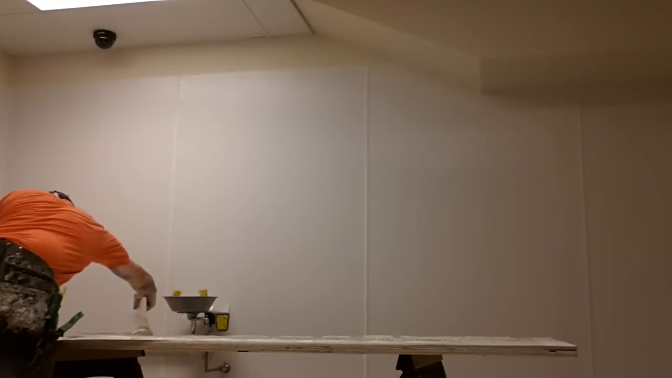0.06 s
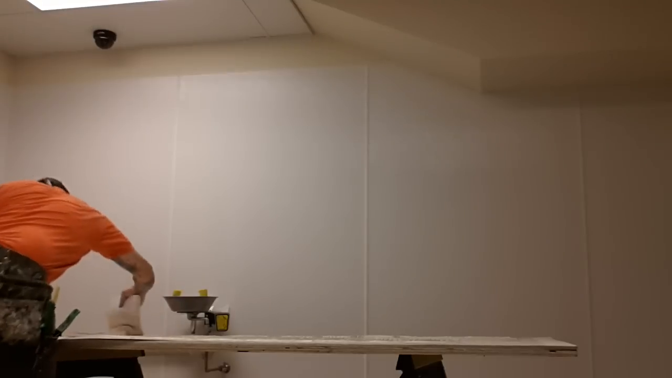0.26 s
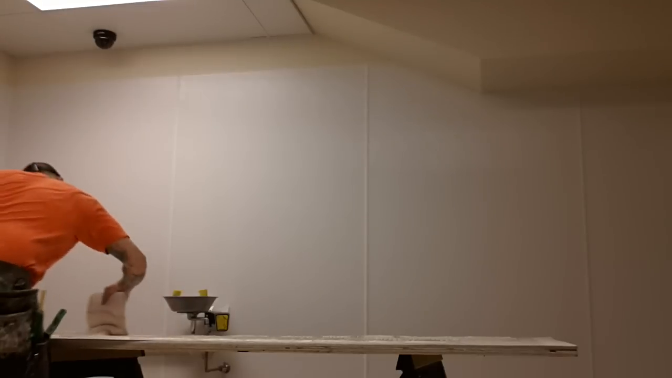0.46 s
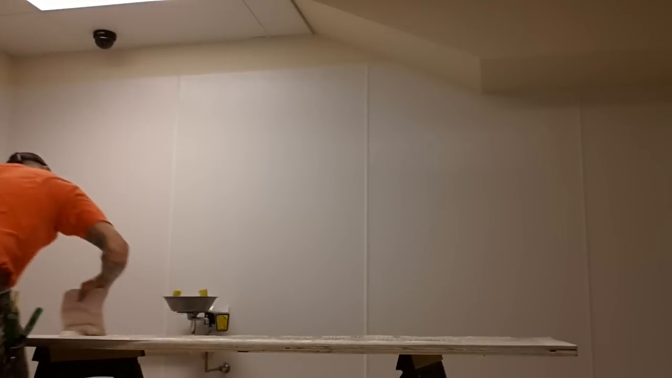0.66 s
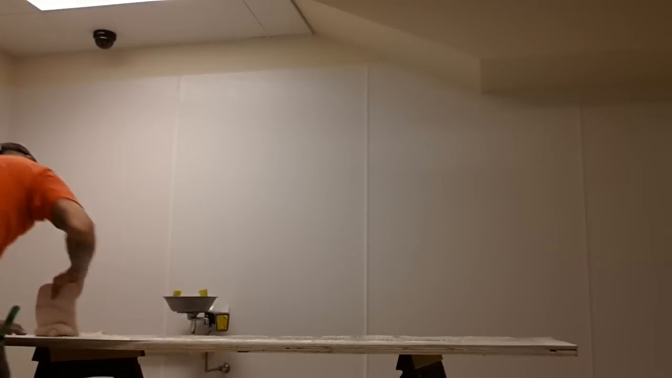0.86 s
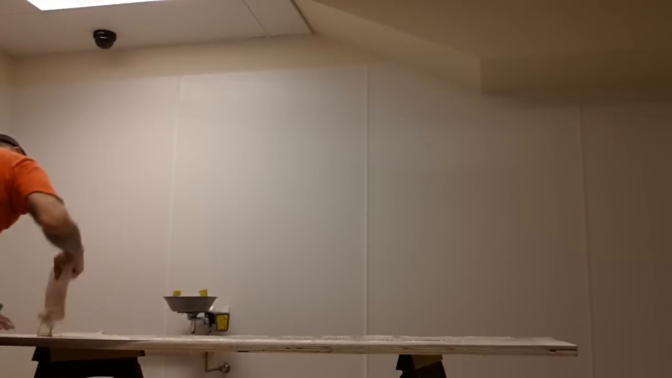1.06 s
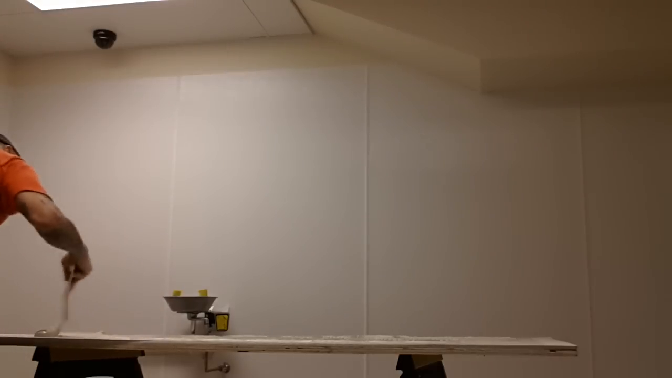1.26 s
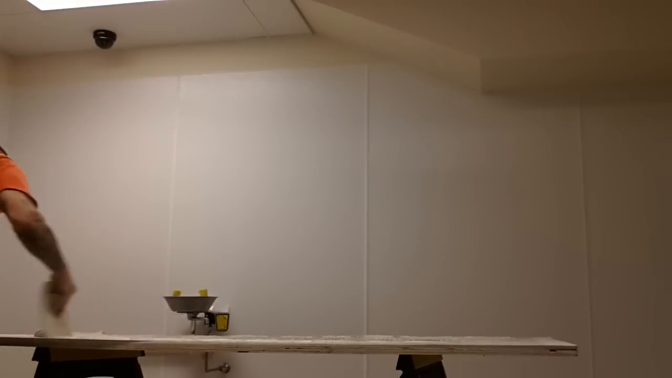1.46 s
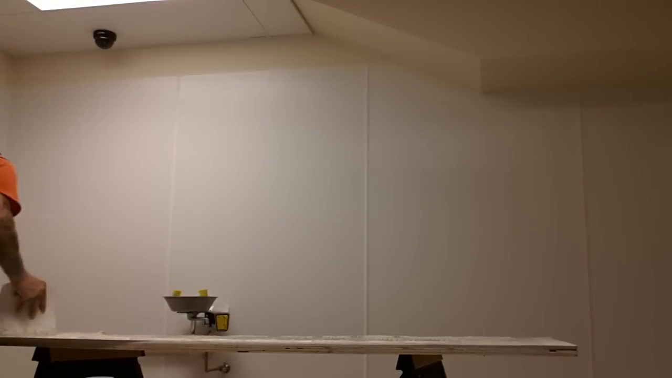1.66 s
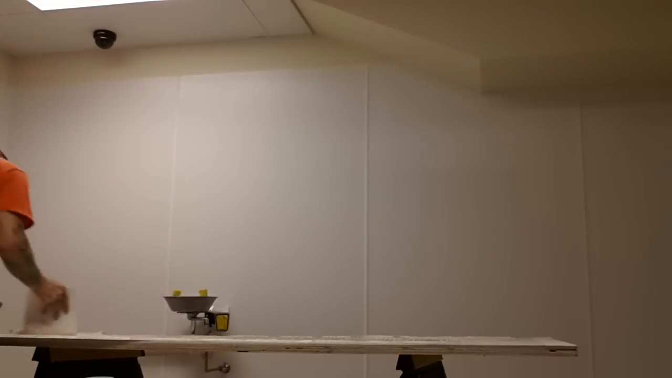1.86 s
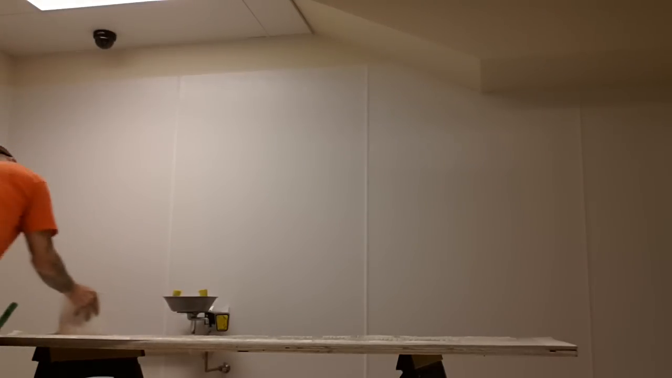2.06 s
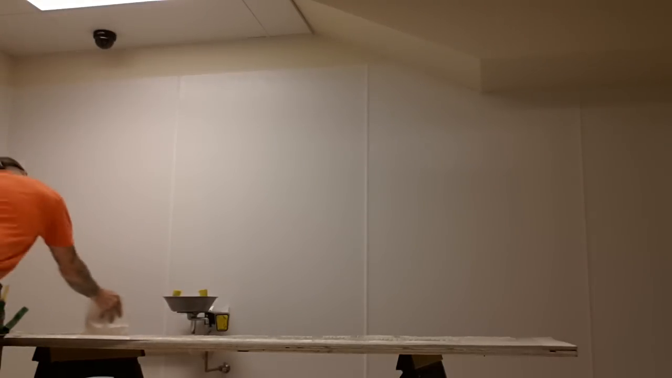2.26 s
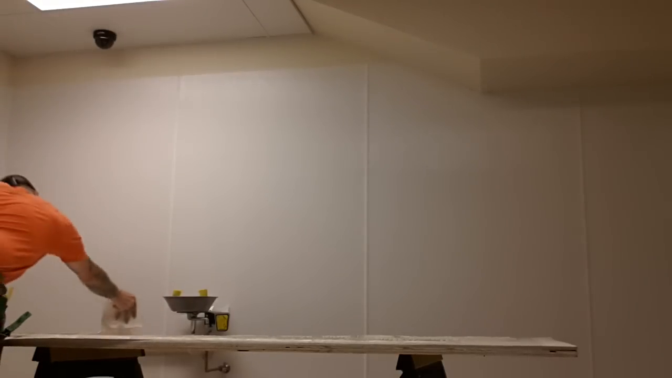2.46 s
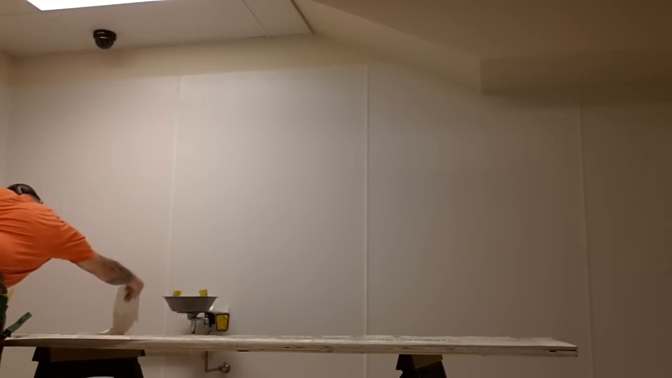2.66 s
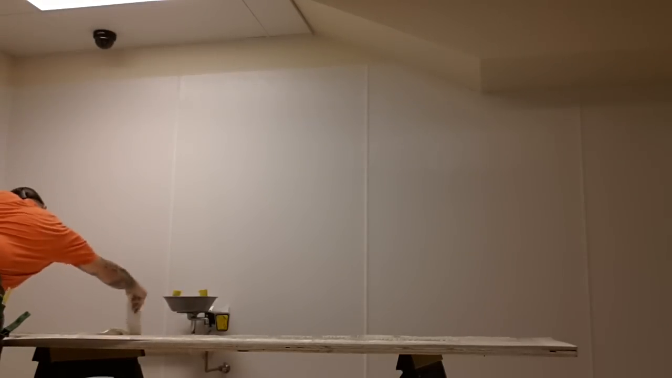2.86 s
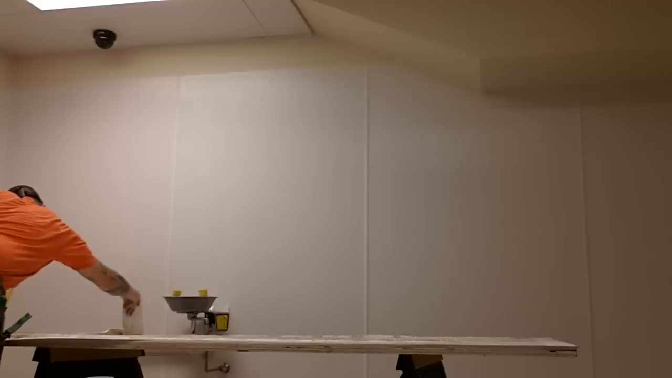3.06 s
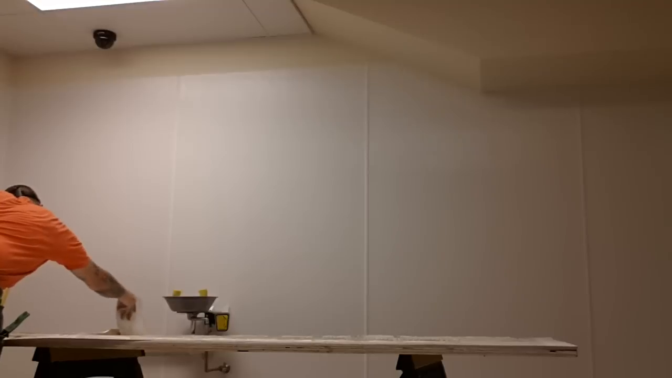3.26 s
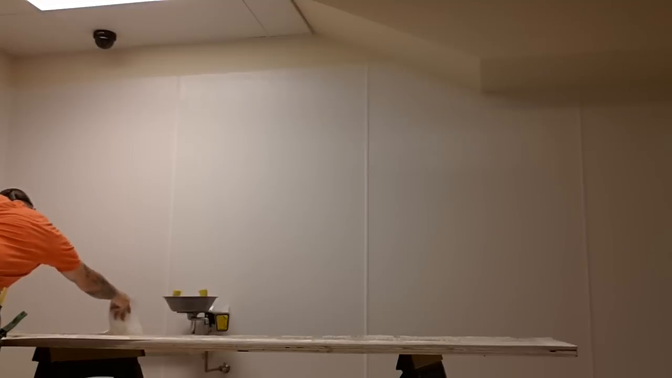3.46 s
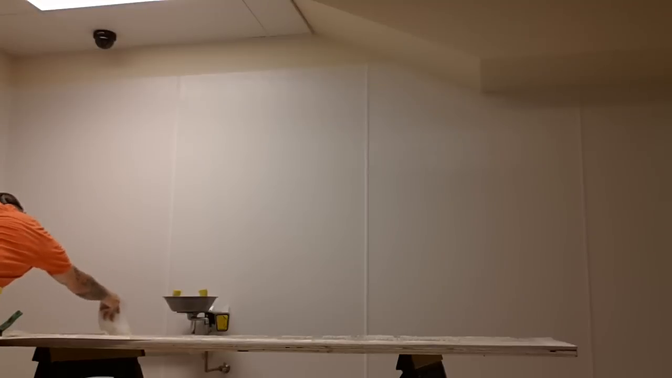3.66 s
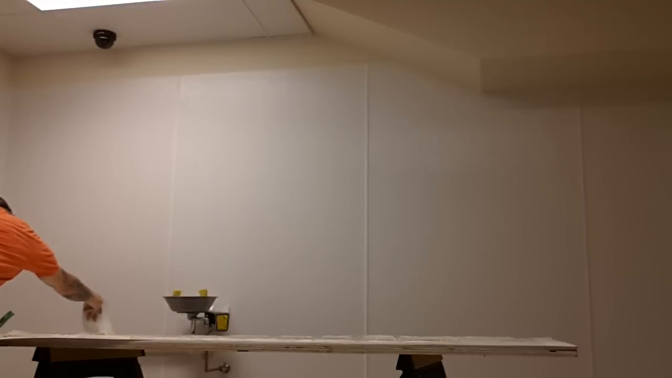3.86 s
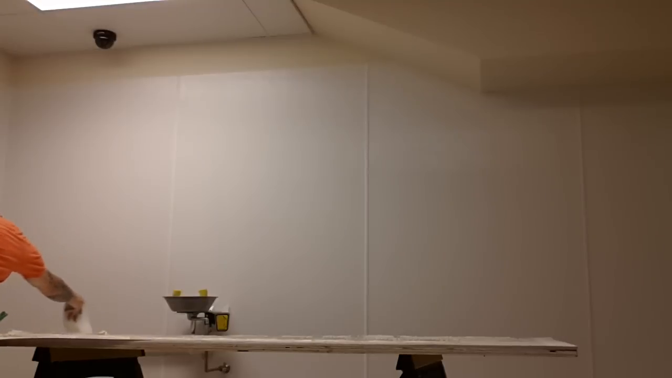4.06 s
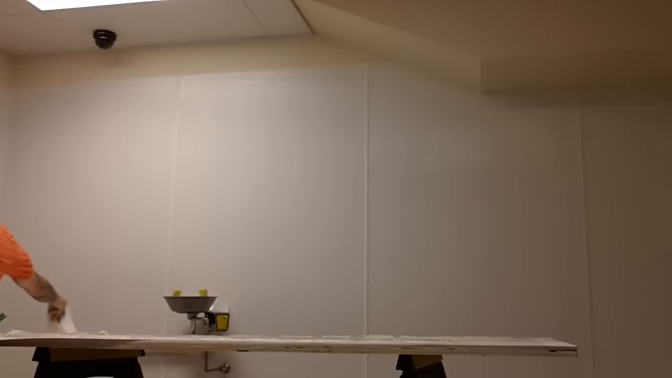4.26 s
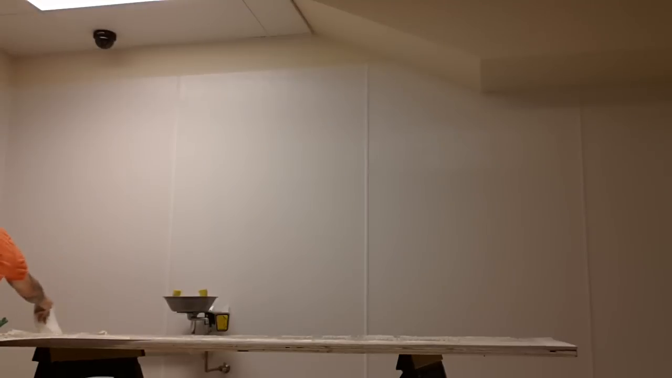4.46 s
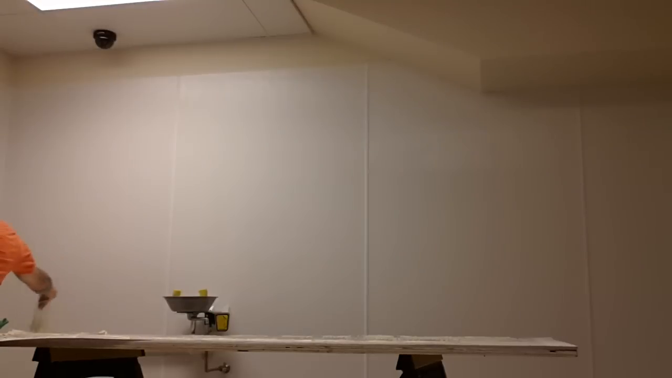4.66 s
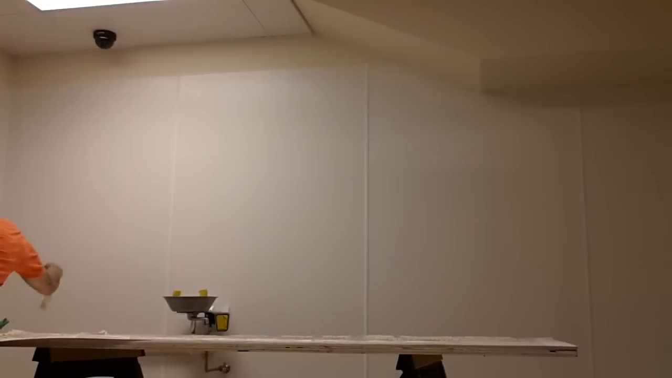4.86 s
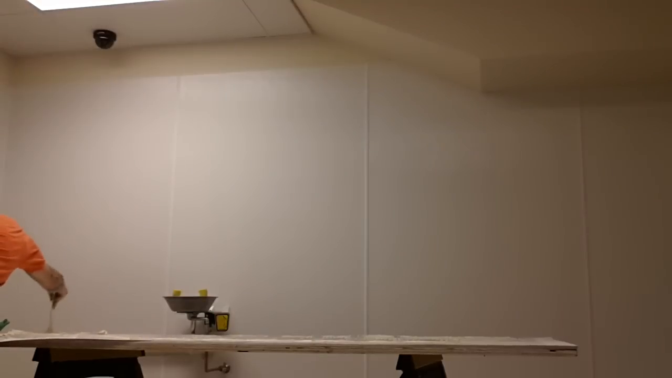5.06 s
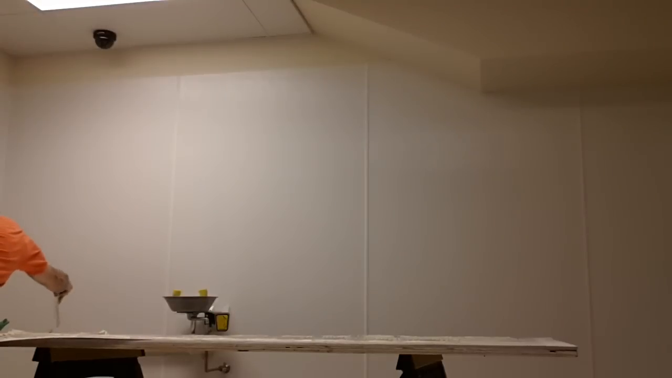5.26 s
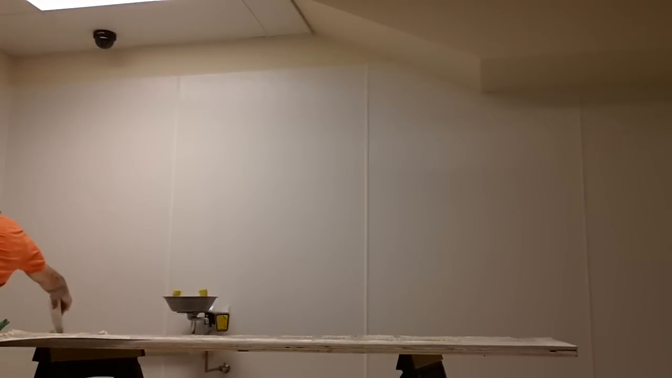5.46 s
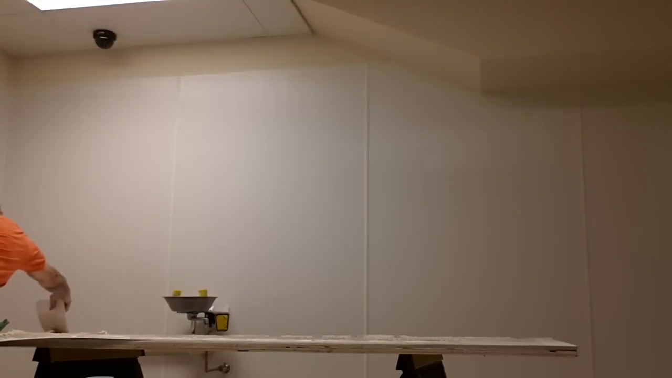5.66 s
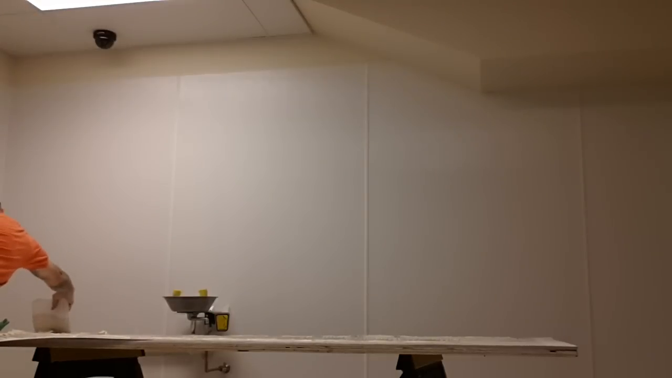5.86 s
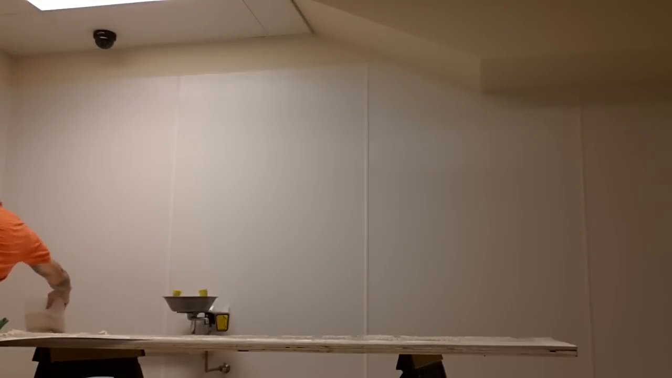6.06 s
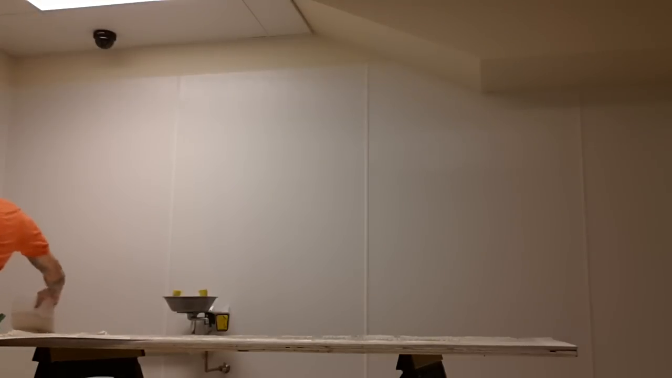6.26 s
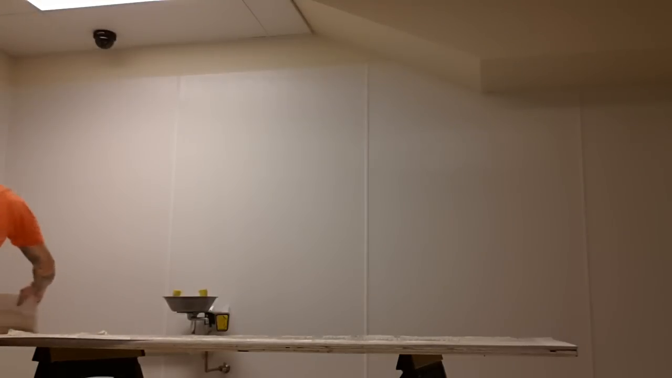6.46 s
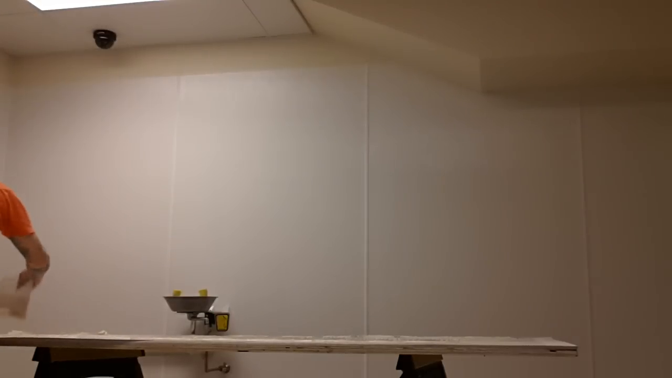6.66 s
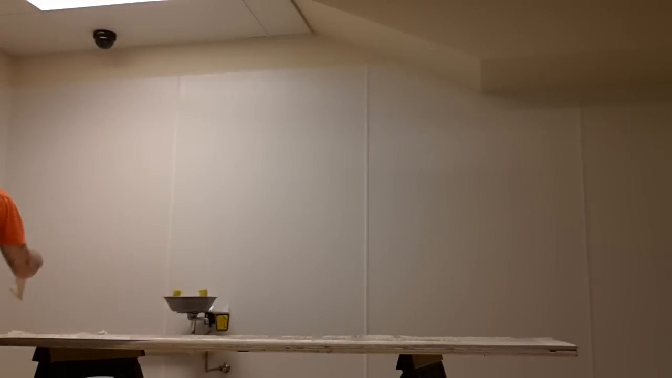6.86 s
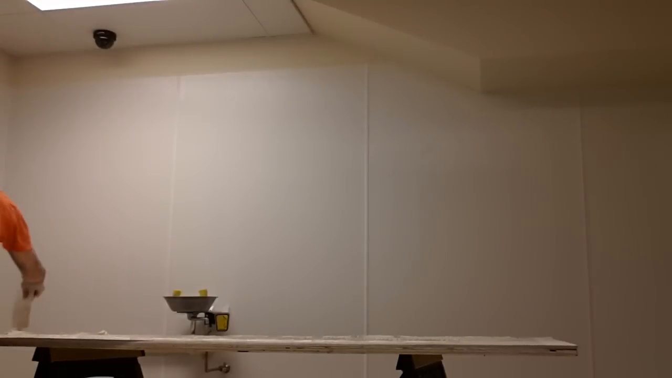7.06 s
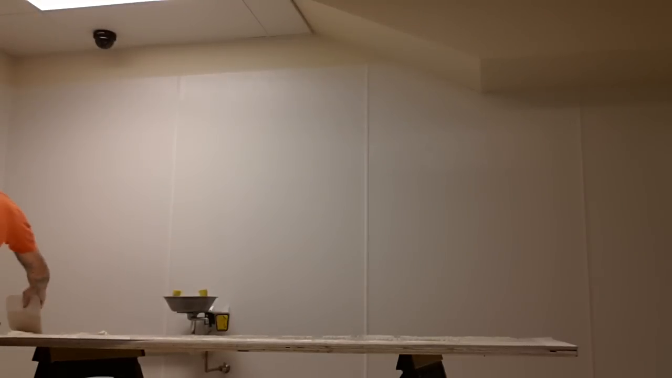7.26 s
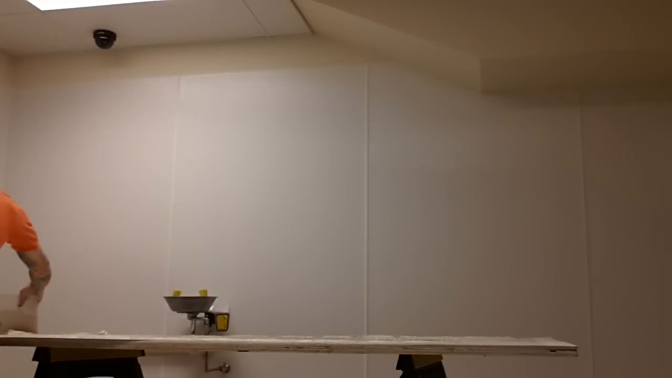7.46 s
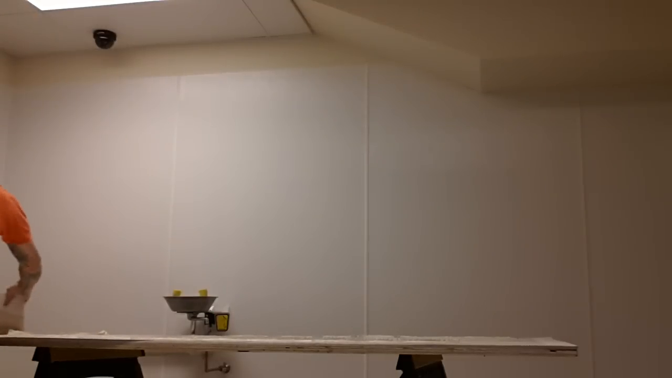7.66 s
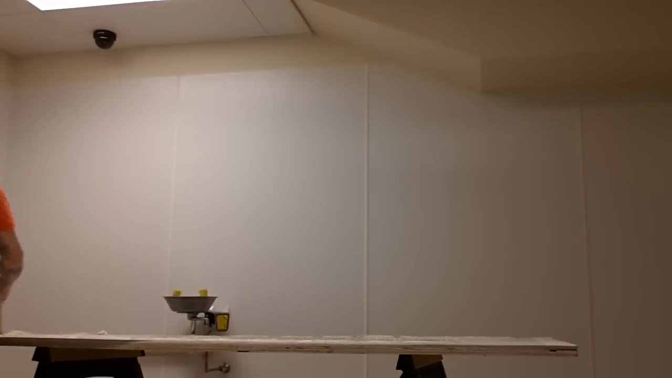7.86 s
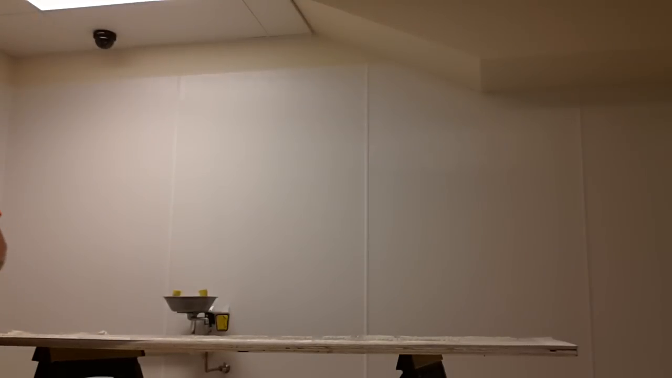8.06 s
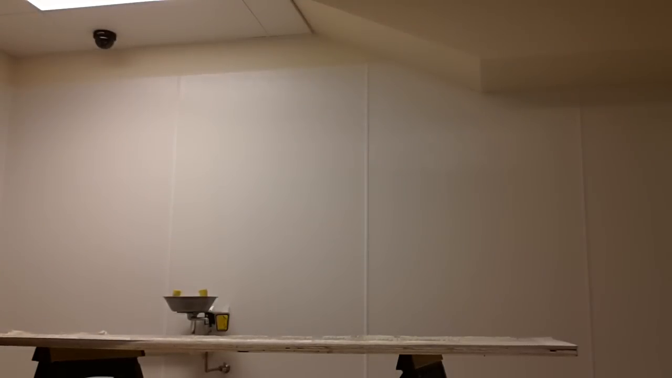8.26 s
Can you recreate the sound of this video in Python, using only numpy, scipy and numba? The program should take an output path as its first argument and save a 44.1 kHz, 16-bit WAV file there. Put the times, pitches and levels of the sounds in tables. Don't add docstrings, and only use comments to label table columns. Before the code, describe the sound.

Steady ventilation rumble and airy hiss fill a reverberant room. A distant trowel drags gritty adhesive in swelling strokes, with low rasp and woody panel drone. Double slaps punctuate the strokes, bright and knocking, their peaks flattened by the microphone's limiter. A faint high metallic ring follows the third long stroke; shorter scrapes, rapid loud slaps and one last hissing drag finish it.

```python
import sys
import numpy as np
from scipy import signal
from scipy.fft import rfft, irfft
from scipy.io import wavfile
from scipy.ndimage import uniform_filter1d
from numba import njit

SR = 44100
rng = np.random.default_rng(int(sys.argv[2]) if len(sys.argv) > 2 else 0)


def unload_wav(signal):
    wavfile.write(
        sys.argv[1],
        SR,
        np.round(np.clip(np.atleast_2d(signal).T, -1, 1) * 32767).astype(np.int16),
    )


def rack_gain(trim_db):
    fader = np.asarray(trim_db, float)
    return 10 ** (fader / 20)


N = 366912
T = np.arange(N) / SR

# (frequency [Hz], level [dB per Hz])
VENT_SPECTRUM = [(20, -6), (45, -11.5), (110, -12), (128, -35), (150, -3.5), (210, -2.5), (540, -9),
                 (900, -18.5), (1840, -14), (2400, -18.5), (4500, -25), (6700, -36), (9000, -38),
                 (13000, -45)]
# (frequency [Hz], width [Hz], level [dB])
DUCT_MODES = [(75.5, 14, -5), (164, 41, 0.5)]
# (frequency [Hz], time to fall 60 dB [s])
ROOM_DECAY = [(100, 1.64), (260, 0.81), (700, 1), (1840, 0.98), (4850, 0.75), (9000, 0.58), (11000, 0.76),
              (13000, 0.3)]
# (frequency [Hz], likeness [0-1])
LIKENESS = [(60, 0.72), (200, 0.92), (350, 0.85), (640, 0.33), (1200, 0)]
# (frequency [Hz], left minus right [dB])
MIC_TILT = [(100, 1.5), (2000, 1.5), (4000, 5), (8000, -7.5), (12000, -1.5)]

# (time [s], level [dB])
ROCKS = [
    (1.209, -47),
    (1.43, -48.5),
    (2.889, -47),
    (3.378, -56),
    (5.061, -43.5),
    (5.499, -51),
    (5.78, -57),
    (7.3, -53),
    (7.88, -54),
    (8.12, -56),
]

# (time [s], smack [dB], panel thud minus smack [dB],
# panel knock minus smack [dB], knock centre [Hz])
EDGE_SLAPS = [
    (1.1995, -15.5, -32, 1, 492.5),
    (1.4232, -16.5, -18.5, -9.5, 520),
    (2.8847, -7.5, -14, -1.5, 790),
    (5.044, -6.5, -15, -1, 710),
    (6.907, -22, -19, -12, 571),
    (7.0485, -8, -10.5, -2, 565),
    (7.1193, -5.5, -18.5, -29, 493),
    (7.3078, -17.5, -7.5, 0.5, 426),
]
# (time [s], smack [dB], panel thud minus smack [dB],
# panel knock minus smack [dB], knock centre [Hz])
FLAT_SLAPS = [
    (1.2065, -9.5, -17, 0.5, 635),
    (1.4368, -18, -12, -1.5, 940),
    (2.99, -10, -15.5, -0.5, 820),
    (5.1292, -8.5, -17, -7, 790),
    (5.4922, -25.5, -10, -3, 580),
    (6.921, -19, -34, -30, 900),
    (7.0772, -7, -16, -33, 560),
    (7.178, -11, -16, -4, 706),
]
# (frequency [Hz], width [Hz], level [dB])
THUD_MODES = [(196.8, 11.8, -5.5), (249.3, 4.5, 7), (298.3, 10.7, 2.5), (329.6, 10.3, -0.5),
              (387, 78, -5.5)]
# (frequency [Hz], width [Hz], level [dB])
KNOCK_MODES = [(470, 42, -2.5), (575, 67, 0.5), (614.5, 85, -0.5), (769, 116, -2), (908, 172, -5),
               (1148, 169, -2), (1500, 320, -13)]
# (frequency [Hz], level [dB per Hz])
SMACK_SPECTRUM = [(710, -14.5), (1200, -9), (1900, -6), (3500, -9.5), (4800, -6.5), (6700, -4), (8500, -15),
                  (11000, -19), (14500, -32.5), (15500, -73)]

# (time [s], level [dB])
SPRINGS = [
    (4.11, -46),
    (4.32, -50),
    (4.44, -48),
    (4.56, -46),
    (4.65, -40),
    (4.76, -43),
    (4.945, -51),
]
# (frequency [Hz], level [dB], fade [s])
FAINT_BLADE_MODES = [(3520, -56, .25), (4181, -65, .4), (4672, -61, 1.), (6820, -57, 1.), (7200, -59, .3)]

# (blade lifts at [s], slowing lasts [s], speeding up lasts [s], hiss when fastest [dB],
# hiss at first touch, below the fastest [dB])
STROKES = [
    (1.015, 0.54, 0.48, -36, 6.5),
    (2.715, 0.38, 0.73, -36, 1.5),
    (4.3, 0.21, 0.75, -38.5, 7.5),
    (4.635, 0.3, 0.061, -38, 6),
    (5.04, 0.3, .06, -47, -1),
    (5.94, 0.063, 0.06, -45.5, -0.5),
    (6.48, 0.35, 0.11, -40.5, 4.5),
    (6.63, .04, 0.31, -36, 8),
    (6.84, .11, .05, -42.5, 7),
    (8.2, 0.21, 0.42, -38, 0.5),
]
# (heaviest at [s], builds for [s], eases for [s], panel drone [dB],
# drone centre [Hz])
LEANS = [(.1, 0.11, 0.056, -48.5, 644), (.5, 0.29, 0.39, -40, 500), (.82, 0.49, 0.26, -40.5, 600),
         (2.15, .3, 0.27, -37.5, 594), (3.62, .2, 0.24, -39, 410), (4.0, .4, 0.35, -34, 392),
         (4.7, 0.44, 0.27, -50, 365), (5.8, 0.068, 0.15, -48.5, 640), (6.58, .38, 0.19, -44.5, 446),
         (6.74, 0.11, 0.14, -47, 380), (7.75, 0.39, 0.27, -45, 467), (8.03, 0.26, 0.27, -43, 510)]
# (frequency [Hz], level [dB per Hz])
HISS_SPECTRUM = [(1470, -22), (2500, -10), (4010, -5), (6490, 1), (6850, 1), (8350, -9.5), (13800, -22.5),
                 (14800, -44), (15500, -76)]
# (frequency [Hz], level [dB per Hz])
RASP_SPECTRUM = [(470, -54), (800, 6), (1040, 0.5), (1640, 2), (2490, -8), (3200, -12.5), (4160, -62),
                 (7040, -120)]
# (frequency [Hz], width [Hz], level [dB])
DRONE_MODES = [(246, 28, 0), (315.5, 16, 5.5), (389, 55, -2.5), (490.6, 16.7, 2), (567, 37, -2.5),
               (683, 54, 1), (780, 104, -3), (847, 104, -12)]


def on_log(table, hz):
    f, v = np.transpose(table)
    return np.interp(np.log(hz + 1), np.log(f), v)


def shape(x, gain_of_hz):
    n = x.shape[-1]
    return irfft(rfft(x) * gain_of_hz(np.arange(n // 2 + 1) * SR / n), n)


def unit(x):
    return x / np.sqrt(np.mean(x ** 2))


def colour(x, table):
    return unit(shape(x, lambda hz: rack_gain(on_log(table, hz))))


def resonate(x, modes):
    total = 0
    for k, (hz, width, db) in enumerate(modes):
        ring = signal.lfilter(*signal.iirpeak(hz, hz / width, SR), x)
        total = total + (-1) ** k * rack_gain(db) * ring
    return total


def pair(n):
    mid, side = rng.standard_normal((2, n))
    mid = shape(mid, lambda hz: np.sqrt((1 + np.clip(on_log(LIKENESS, hz), 0, 1)) / 2))
    side = shape(side, lambda hz: np.sqrt((1 - np.clip(on_log(LIKENESS, hz), 0, 1)) / 2))
    return np.array([mid + side, mid - side])


def walk(rate):
    k = int(SR / rate)
    steps = np.repeat(rng.standard_normal(N // k + 1), k)
    return 0.83 * uniform_filter1d(uniform_filter1d(steps, k), k)[:N]


@njit
def sweep(x, hz, k):
    y, b, l = np.empty(len(x)), 0., 0.
    for i in range(len(x)):
        g = np.tan(np.pi * hz[i] / SR)
        v = (b + g * (x[i] - l)) / (1 + g * (g + k))
        b, l, y[i] = 2 * v - b, l + 2 * g * v, k * v
    return y


@njit
def follow(x, attack, release):
    e, out = 0., np.empty(len(x))
    for i in range(len(x)):
        e += (x[i] - e) * (attack if x[i] > e else release)
        out[i] = e
    return out


def vent():
    air = pair(N)
    duct = unit(sum(resonate(resonate(air, [mode]), [mode]) for mode in DUCT_MODES))
    duct = duct * rack_gain(-4.5 + 1.8 * walk(11.0))
    uneven_db = 0.8 * walk(3) + 1.2 * walk(15)
    rush = colour(pair(N), VENT_SPECTRUM) * rack_gain(uneven_db)
    return (rush + duct) * rack_gain(-45)


def room(x, direct_db=18, build_s=0.0013):
    t = T[:SR + SR // 5]
    noise, tail = pair(len(t)), 0
    for centre in 50 * 2 ** np.arange(0, 9, 0.5):
        band = shape(noise, lambda hz: np.cos(np.pi * np.clip(np.log2((hz + 1) / centre), -0.5, 0.5)) ** 2)
        tail = tail + band * rack_gain(-60 * t / on_log(ROOM_DECAY, centre))
    tail = tail * (1 - np.exp(-t / build_s))
    tail[:, 0] = rack_gain(direct_db)
    return signal.fftconvolve(x[None], tail, axes=1)[:, :N]


def trestles():
    rock_hz, rock_s = 73.7, 0.041
    t, out = T[:SR // 3], np.zeros(N + SR)
    swell = t / rock_s * np.exp(-t / rock_s)
    bump = swell * np.sin(2 * np.pi * rock_hz * t)
    for s, db in ROCKS:
        i = int(s * SR)
        out[i:i + len(t)] += rack_gain(db + 13.5) * bump
    return out[:N]


def crack(contact_s):
    t = T[:2048] / np.clip(contact_s, 0.0005, 0.012)
    x = rng.standard_normal(len(t))
    for _ in range(8):
        bins = rfft(x * np.sqrt(t * np.exp(-t)))
        x = irfft(bins / np.abs(bins))
    return x


def smack_click():
    grid = np.linspace(0, 1, 129)
    half = signal.firwin2(255, grid, rack_gain(on_log(SMACK_SPECTRUM, grid * SR / 2)))
    click = signal.minimum_phase(np.convolve(half, half))
    return click / np.sqrt(np.sum(click ** 2))


def slaps(table, contact_s, top_hz):
    push = np.zeros((2 + len(KNOCK_MODES), N))
    mode_hz = np.array(KNOCK_MODES)[:, 0]
    for s, smack_db, thud_db, knock_db, knock_hz in table:
        i, burst = int(s * SR), crack(contact_s)
        reach_db = knock_db - 7.1 * np.log2(mode_hz / knock_hz) ** 2
        levels = rack_gain(smack_db + np.r_[0, thud_db, reach_db])
        push[:, i:i + len(burst)] += burst * levels[:, None]
    smack = signal.fftconvolve(push[0], smack_click())[:N]
    thud = resonate(push[1], THUD_MODES)
    knock = 0
    for k, (p, mode) in enumerate(zip(push[2:], KNOCK_MODES)):
        knock = knock + (-1) ** k * resonate(p, [mode])
    panel = rack_gain(24.0) * thud + rack_gain(17.5) * knock + rack_gain(-5) * smack
    band = signal.butter(3, [175, top_hz], "band", fs=SR, output="sos")
    return room(signal.sosfilt(band, panel))


def blade():
    lift_s, land_s = 4.76, 5.04
    sing_hz, rise_s, fade_db_per_s = 6636, 0.018, 48
    rings = []
    for s, db in SPRINGS:
        fade = rack_gain(db - fade_db_per_s * np.maximum(T - s, 0))
        rings.append(fade * np.clip((T - s) / rise_s, 0, 1))
    tone = np.sin(2 * np.pi * np.cumsum(sing_hz + 6 * walk(14)) / SR)
    main = np.max(rings, axis=0) * tone * rack_gain(2.7 * walk(25))
    faint = 0
    for mode_hz, mode_db, fade_s in FAINT_BLADE_MODES:
        level = rack_gain(mode_db + 2.5 * walk(12)) * np.exp(-np.abs(T - lift_s) / fade_s)
        faint = faint + level * np.sin(2 * np.pi * mode_hz * T)
    lifted = np.clip((T - lift_s) / 0.03, 0, 1)
    left_right = rack_gain(np.array([[-1.0], [1.5]]))
    return (main + faint * lifted) * (T < land_s) * left_right


def drag():
    touch_db_per_s, slowing_db_per_s, lift_db_per_s = 52, 7, 100
    power = 0
    for lift, down_s, up_s, db, below_db in STROKES:
        t = T - lift
        drop_db = np.interp(t, [-down_s - up_s, -down_s, 0], [below_db, 0, slowing_db_per_s * down_s])
        before_db = touch_db_per_s * np.maximum(-t - down_s - up_s, 0)
        after_db = lift_db_per_s * np.maximum(t, 0)
        power = power + rack_gain(db - drop_db - before_db - after_db) ** 2
    return np.sqrt(power)


def lean():
    power = 0
    for s, build_s, ease_s, db, _ in LEANS:
        swell = np.sin(np.interp(T - s, [-build_s, 0, ease_s], [0, np.pi / 2, 0]))
        power = power + (rack_gain(db) * swell) ** 2
    leans = np.array(LEANS)
    return np.sqrt(power), np.interp(T, leans[:, 0], leans[:, -1])


def strokes():
    speed, (load, drone_hz) = drag(), lean()
    octaves = np.log2(drone_hz / 578)
    pan_db = -0.5 - 2.5 * octaves
    grains = unit(rng.standard_normal(N) * rack_gain(1.4 * rng.exponential(1, N)))
    wet = (rack_gain(-15.0) * grains + pair(N)) * rack_gain(1.56 * walk(25))
    hiss, rasp = colour(wet, HISS_SPECTRUM), colour(wet, RASP_SPECTRUM)
    width = 0.85
    shaken = resonate(wet, DRONE_MODES)
    drone = np.array([sweep(sweep(c, drone_hz, width), drone_hz, width) for c in shaken])
    drone = unit(drone) * rack_gain(1.7 * walk(30))
    rasp_gain = np.hypot(speed * rack_gain(-9), load * rack_gain(-1 + 19 * octaves))
    drone_gain = np.hypot(speed * rack_gain(-12), load)
    left_right = rack_gain(np.array([pan_db, -pan_db]) / 2)
    return left_right * (speed * hiss + rasp_gain * rasp + drone_gain * drone)


def scene():
    edge = slaps(EDGE_SLAPS, contact_s=0.0015, top_hz=17100)
    flat = slaps(FLAT_SLAPS, contact_s=0.00504, top_hz=9100)
    return edge + flat + strokes() + blade() + trestles() + vent()


def band_limit(x):
    return signal.sosfilt(signal.butter(12, 15840, fs=SR, output="sos"), x)


def record(dry):
    limit_db, attack_s, release_s = -7.5, 0.0021, 0.028
    x = shape(dry, lambda hz: rack_gain(np.array([[0.5], [-0.5]]) * on_log(MIC_TILT, hz)))
    x = signal.sosfilt(signal.butter(2, 40, "high", fs=SR, output="sos"), x)
    level = follow(np.abs(x).max(axis=0), 1 / (attack_s * SR), 1 / (release_s * SR))
    x = np.clip(x * np.minimum(1, rack_gain(limit_db) / (level + 1e-9)), -1, 1)
    mix = signal.sosfilt(signal.ellip(8, 0.2, 70, 15000, fs=SR, output="sos"), x)
    return band_limit(mix)


dry = scene()
out = record(dry)
unload_wav(out)
```